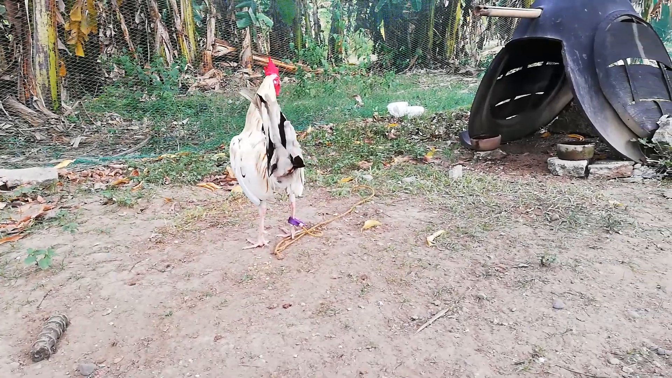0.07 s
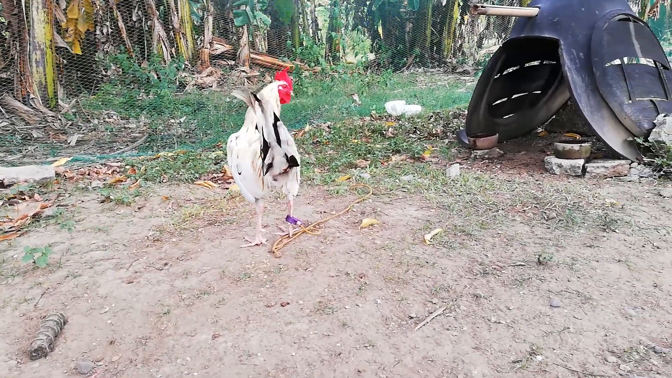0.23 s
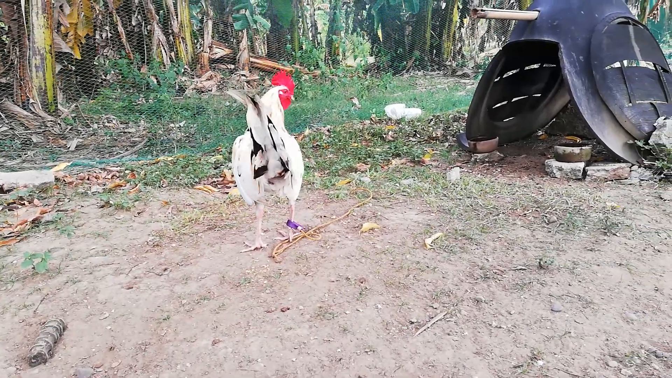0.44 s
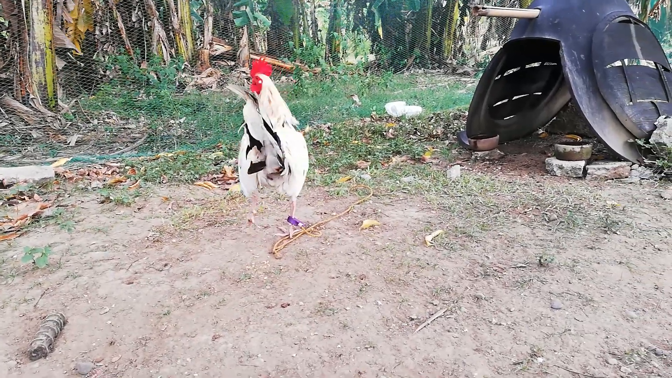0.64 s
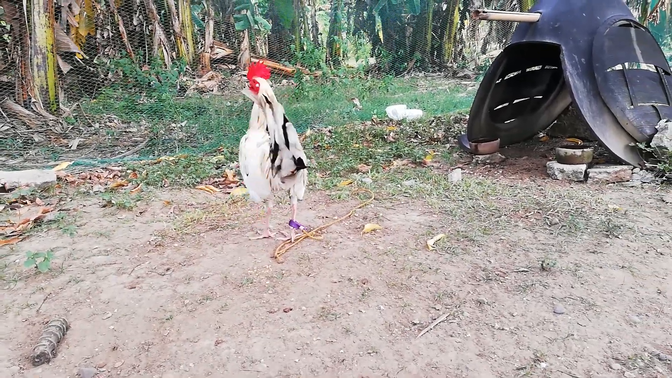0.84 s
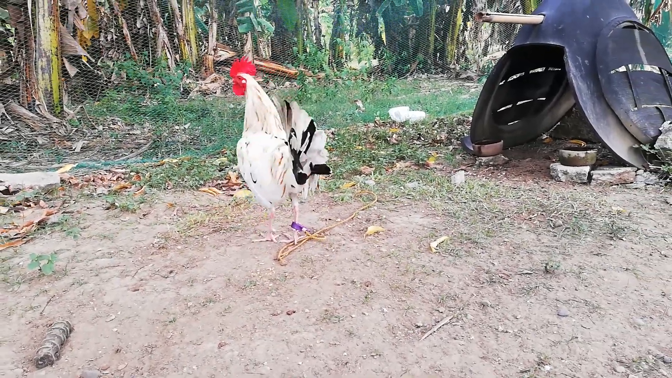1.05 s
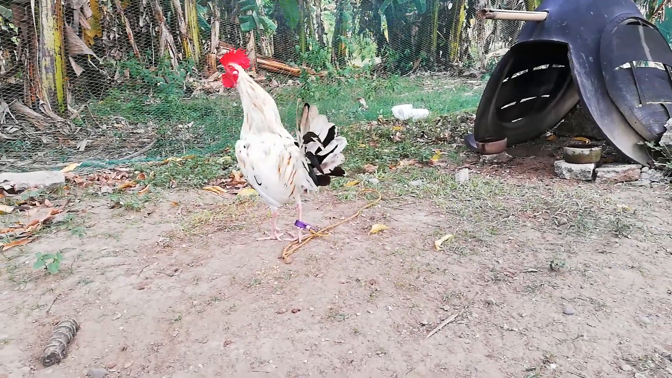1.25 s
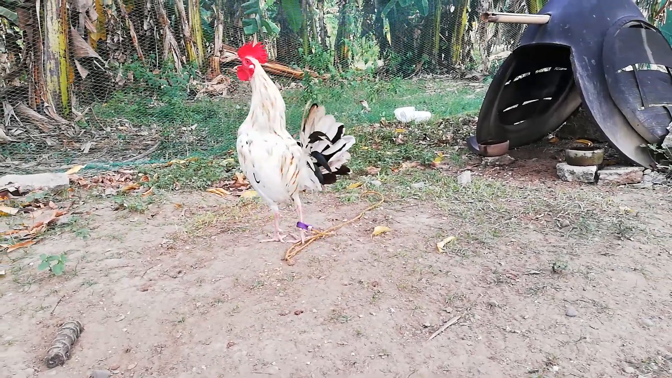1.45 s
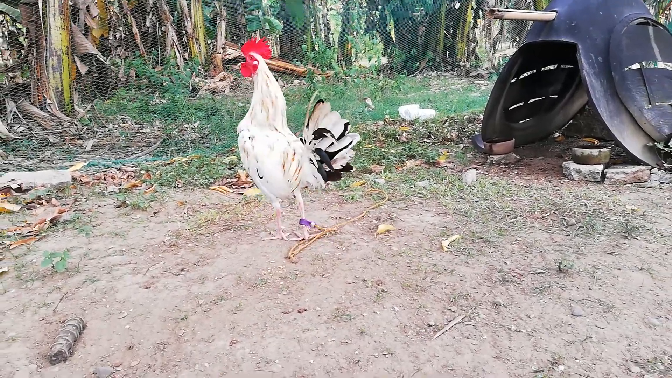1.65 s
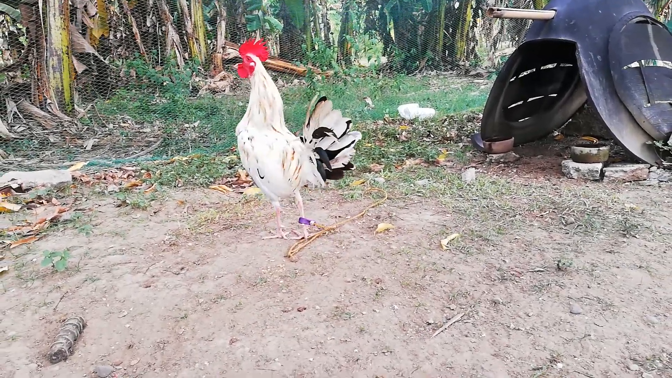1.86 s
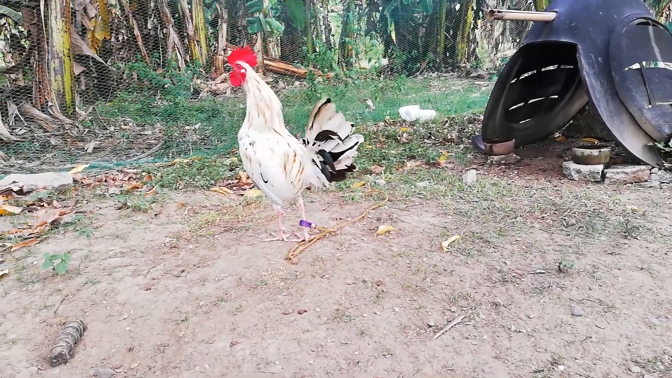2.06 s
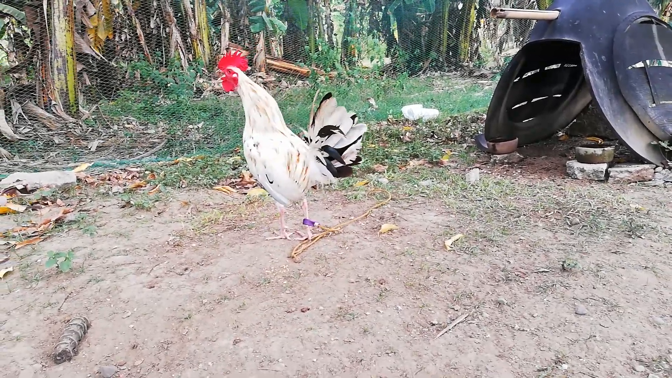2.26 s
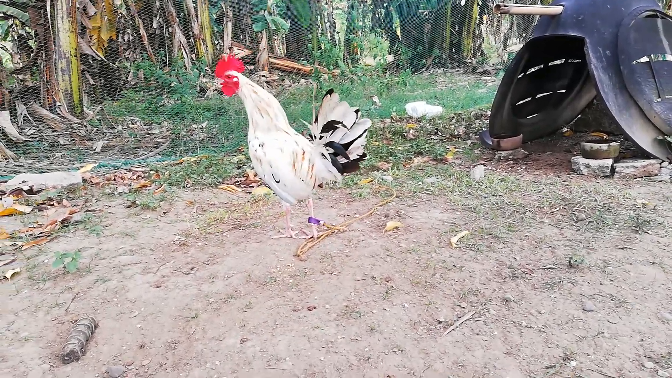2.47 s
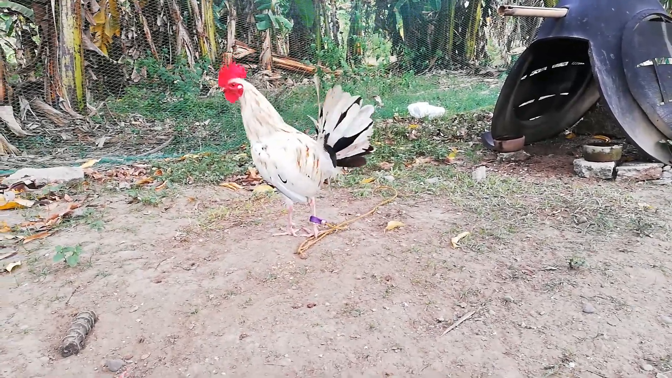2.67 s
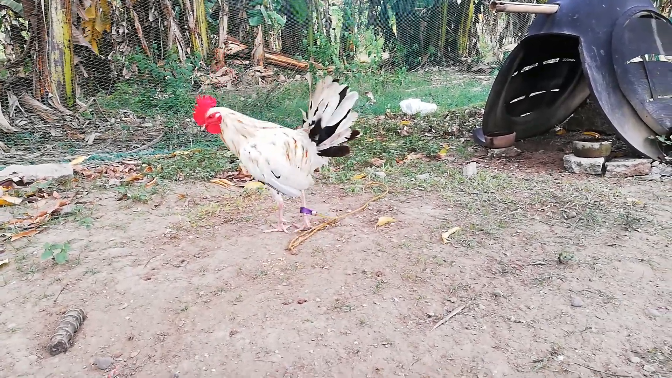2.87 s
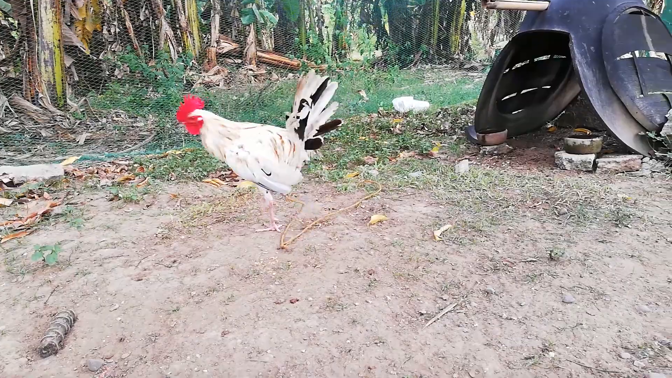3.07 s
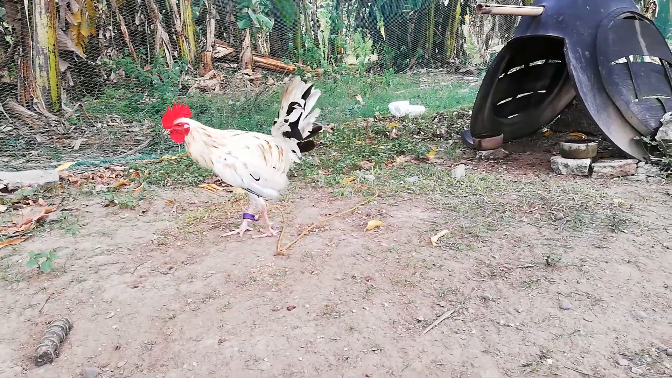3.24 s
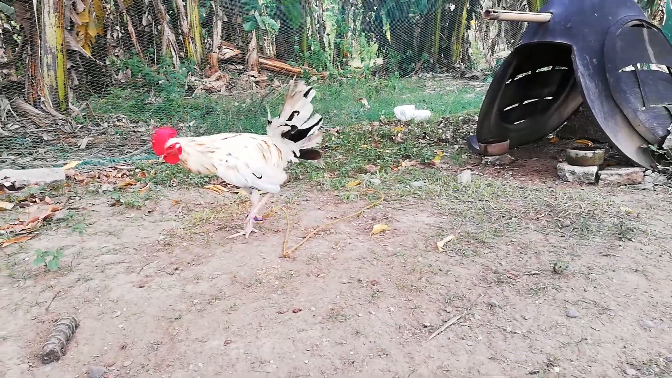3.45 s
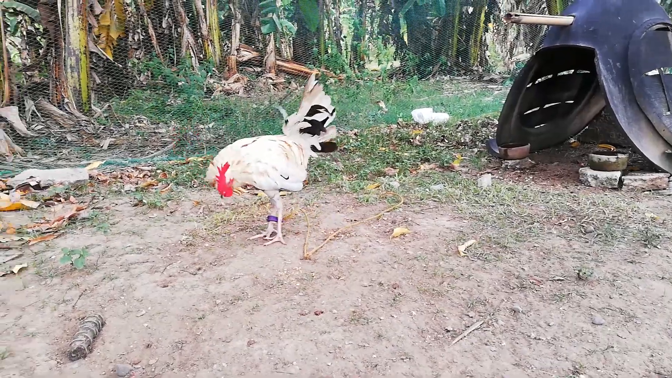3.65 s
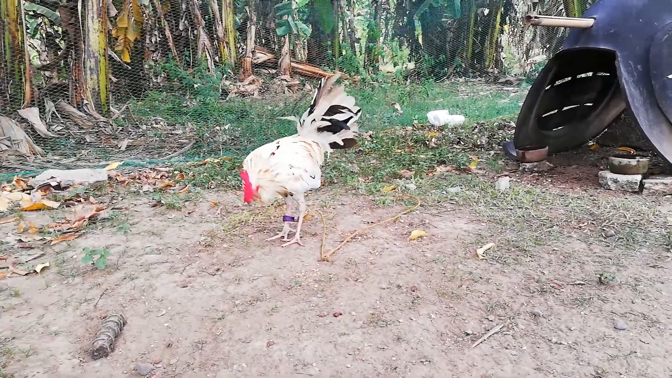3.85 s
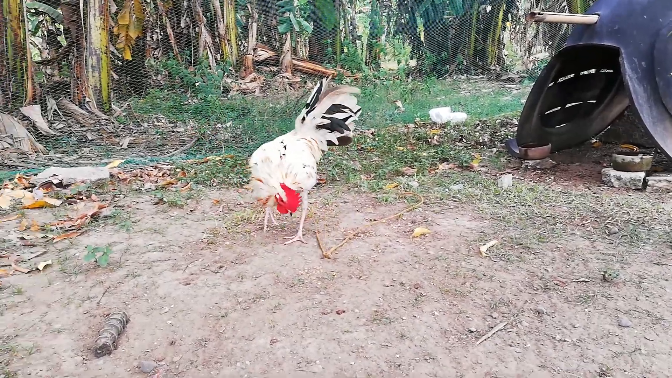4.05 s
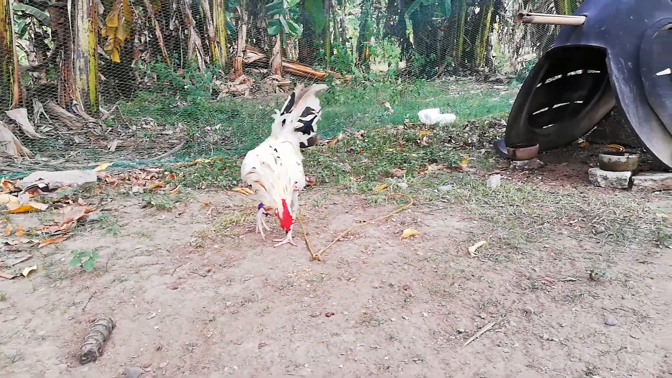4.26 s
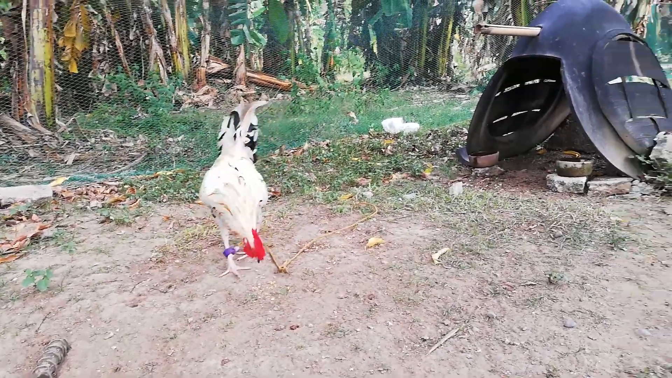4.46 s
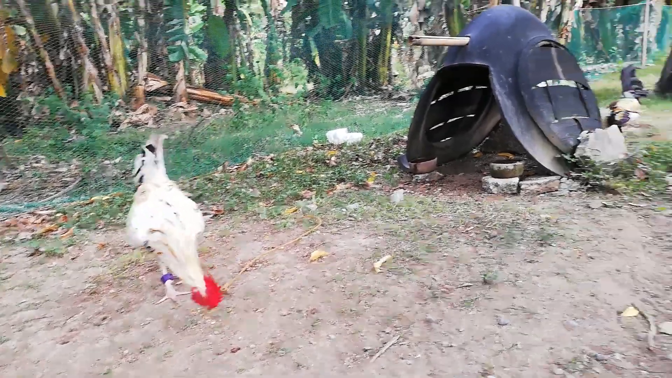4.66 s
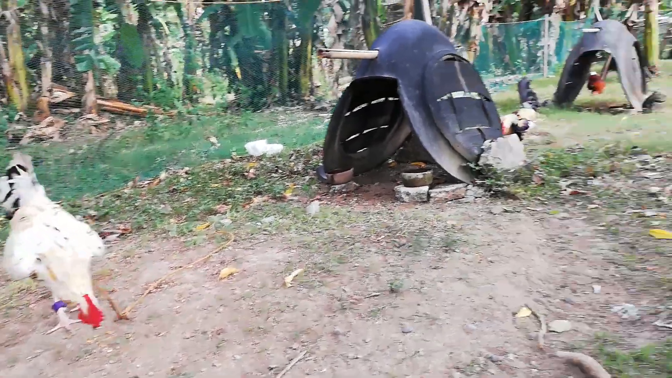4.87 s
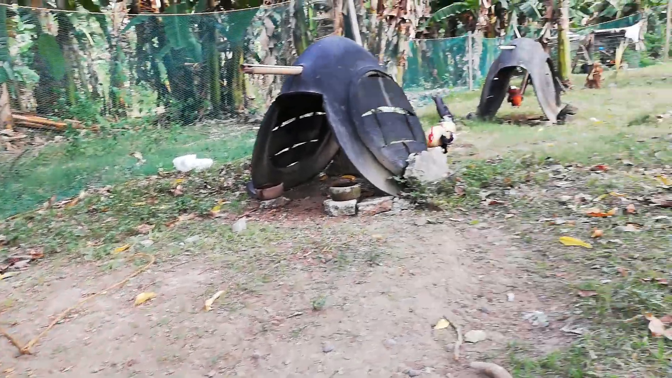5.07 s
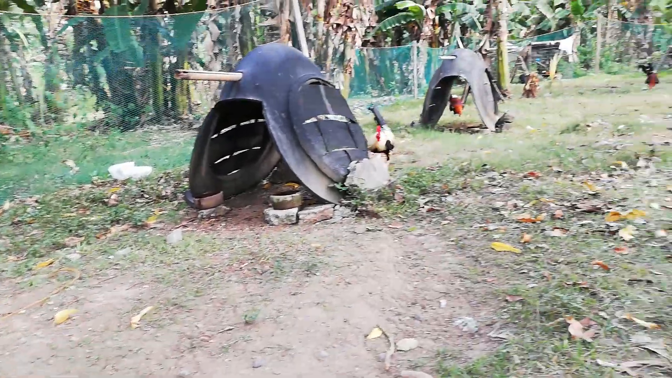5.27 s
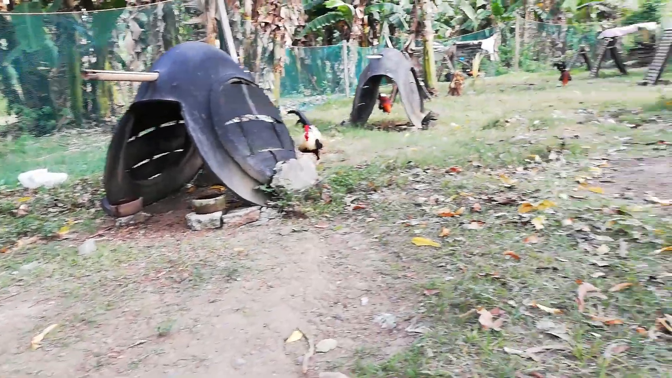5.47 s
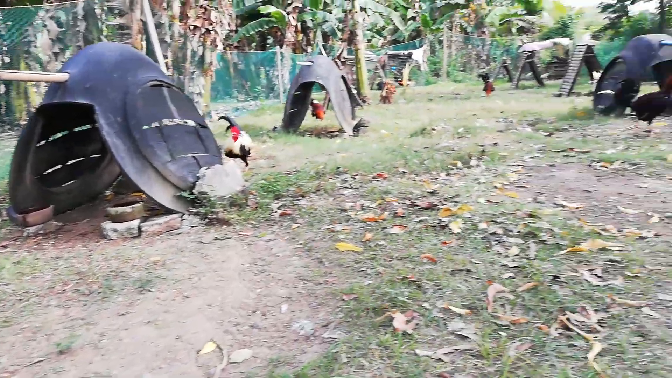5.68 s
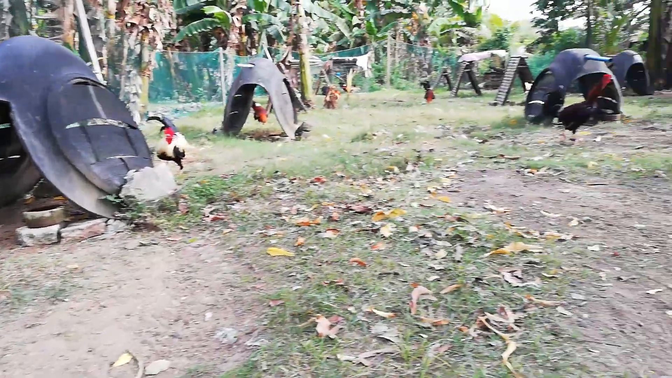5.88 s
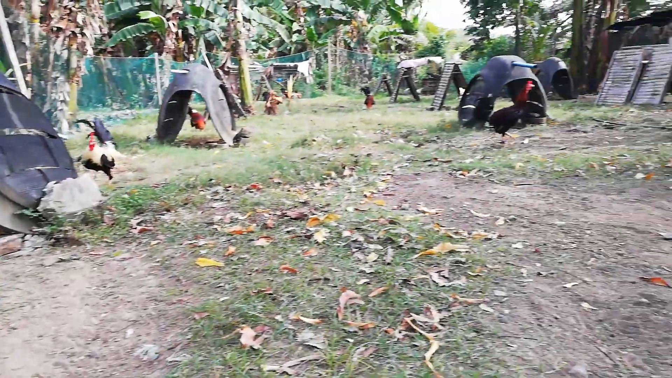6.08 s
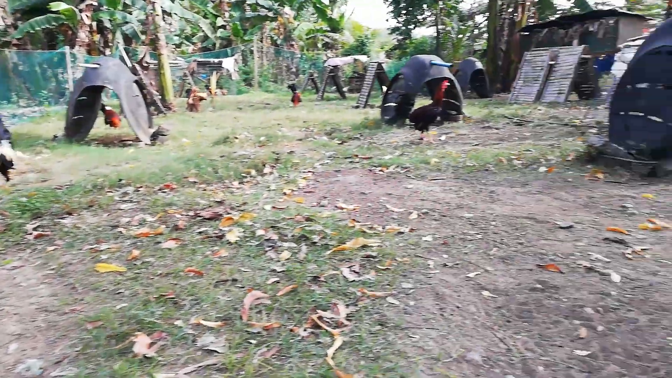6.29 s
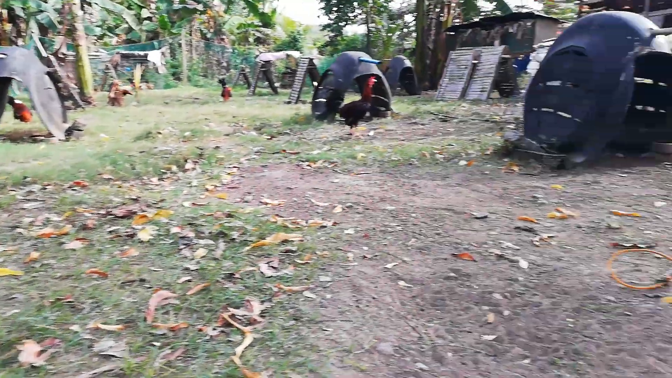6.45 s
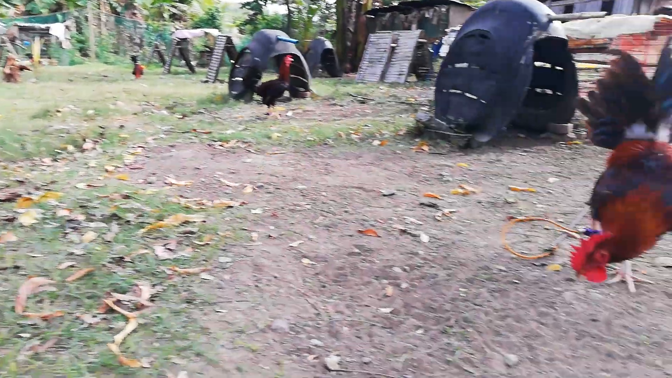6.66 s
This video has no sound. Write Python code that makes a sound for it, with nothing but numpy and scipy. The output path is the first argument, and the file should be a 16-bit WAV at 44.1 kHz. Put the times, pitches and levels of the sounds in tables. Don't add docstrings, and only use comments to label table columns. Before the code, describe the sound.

A nearby rooster gives one loud, raspy crow that sags in pitch, then clucks softly over food while microphone bumps and leaves rustle outdoors.

```python
import sys
import numpy as np
from scipy import signal
from scipy.fft import rfft, irfft, next_fast_len
from scipy.io import wavfile
from scipy.ndimage import uniform_filter1d

SR = 44100
rng = np.random.default_rng(int(sys.argv[2]) if len(sys.argv) > 2 else 0)


def unload_audio(sound):
    columns = np.transpose(np.atleast_2d(sound))
    steps = np.round(np.clip(columns, -1, 1) * 32767)
    wavfile.write(sys.argv[1], SR, steps.astype(np.int16))


def volts_from_db(level):
    exponent = np.asarray(level, float) / 20
    return 10 ** exponent


N = 296386

# frequency in Hz, left minus right in dB.
TURNED_LEAN = [(60, -5), (110, -0.5), (200, 10), (380, -5), (700, -0.5), (1290, -4.5), (2380, -7.5),
               (4400, -10), (8120, -2.5), (15000, 25)]


def evened(x):
    return x / np.sqrt(np.mean(x ** 2) + 1e-20)


def read(points, hz):
    f, value = np.transpose(points)
    return np.interp(np.log(hz + 1), np.log(f + 1), value)


def play(rows):
    s, *columns = np.transpose(rows)
    t = np.arange(s[0], s[-1], 1 / SR)
    return t, [np.interp(t, np.maximum.accumulate(s), c) for c in columns]


def add(mix, s, sound):
    part = mix[..., round(s * SR):][..., :sound.shape[-1]]
    part += sound[..., :part.shape[-1]]


def colour(x, points):
    hz = abs(np.fft.fftfreq(2048, 1 / SR))
    log_gain = np.log(volts_from_db(np.maximum(read(points, hz), -90)))
    taps = np.fft.ifft(np.exp(log_gain - 1j * signal.hilbert(log_gain).imag)).real[:1024]
    y = signal.oaconvolve(x, taps)[:len(x)]
    return y / np.sqrt(abs(uniform_filter1d(y ** 2, size=900)) + 1e-12)


def drift(count, size):
    noise = rng.standard_normal(count)
    return evened(uniform_filter1d(uniform_filter1d(noise, size=size), size=size))


def ports(x, lean, lead):
    size = next_fast_len(len(x), True)
    hz = np.fft.rfftfreq(size, 1 / SR)
    half = volts_from_db(read(lean, hz) / 2) * np.exp(.5j * read(lead, hz))
    return irfft(rfft(x, size) * np.array([half, 1 / half]), size)[:, :len(x)]


def hiss(size, db, same, patchy_db):
    frames, hz = 4 * N // size + 5, np.fft.rfftfreq(size, 1 / SR)[:, None]
    a, b, c, d, patches = rng.standard_normal((5, frames, len(hz))).transpose(0, 2, 1)
    patches = uniform_filter1d(uniform_filter1d(patches, size=9, axis=0), size=7, axis=1)
    patches = evened(patches)
    same = np.clip(same(hz), -1, 1)
    left, other = a + 1j * b, c + 1j * d
    z = np.array([left, same * left + np.sqrt(1 - same ** 2) * other])
    z = z * volts_from_db(db(hz) + patchy_db * patches)
    return evened(signal.istft(z, nperseg=size, noverlap=3 * size // 4)[1][:, :N])


def yard():
    # time in s, rustle level in dB.
    rustle_curve = [(0, -54), (.21, -57.5), (1.27, -53), (2.6, -57), (2.79, -49.5), (3.16, -57),
                    (3.93, -49), (4.18, -54), (4.54, -50), (5.47, -52.5), (5.64, -48), (5.78, -51),
                    (6.49, -53.5), (6.72, -53)]
    # frequency in Hz, level in dB.
    hum_colour = [(150, -35.5), (250, -9), (335, -12.5), (373, -26), (473, -13.5), (1280, -8), (1570, -9),
                  (1770, -6), (6000, -14), (7800, -31), (13200, -120)]
    rustle_colour = [(2060, -49), (3500, -17), (3730, -13), (4250, -16), (4940, -1.5), (6140, 0),
                     (9820, 3.5), (10900, -8), (15600, -31.5)]
    # frequency in Hz, left minus right in dB.
    first_lean = [(60, 1), (110, -1), (200, -3), (380, 2.5), (700, 2), (1290, -5.5), (2380, -6.5),
                  (4400, -6.5), (8120, 11), (15000, 38.5)]
    swing_s = (4.34, 4.37)
    turned_db = 3.5
    t, (rustle_db,) = play(rustle_curve)
    frame_s = np.arange(4 * N // 512 + 5) * 128 / SR
    turned, out = np.interp(frame_s, swing_s, (0, 1)), np.zeros((2, N))
    hum_db = -51 + 0.39 * (rustle_db - rustle_db.mean())
    sides = np.array([.5, -.5])[:, None, None]

    def lean(hz):
        return read(first_lean, hz) * (1 - turned) + read(TURNED_LEAN, hz) * turned

    for level_db, shape, db in ((hum_db, hum_colour, 0), (rustle_db, rustle_colour, turned_db)):
        bed = hiss(512, lambda hz: read(shape, hz) + sides * lean(hz) + db * turned,
                   lambda hz: np.exp(-hz / 200.0), patchy_db=2.0)
        add(out, 0, bed[:, :len(t)] * volts_from_db(level_db + 2.5))
    return out


def insects():
    # start in s, length in s, centre in Hz, level in dB.
    whirrs = [
        (4.5, 0.68, 13900, -59),
        (2.6, .45, 14000, -66),
    ]
    out = np.zeros((2, N))
    for s, length, hz, db in whirrs:
        noise = rng.standard_normal((2, round(length * SR)))
        band = signal.butter(2, [.91 * hz, 1.06 * hz], "bandpass", fs=SR)
        swell = signal.windows.tukey(noise.shape[1], .6)
        add(out, s, volts_from_db(db) * evened(signal.lfilter(*band, noise)) * swell)
    return out


def wind():
    # time in s, breeze level in dB.
    breeze = [(0, -43.5), (1.22, -52), (1.4, -66.5), (2.12, -43.5), (3.02, -40), (3.48, -51.5), (3.93, -46),
              (4.1, -49), (4.4, -33.5), (4.92, -34), (5.15, -46), (5.4, -46.5), (6.12, -58), (6.4, -51.5),
              (6.72, -58)]
    # peak in s, thud in dB, buffet in dB, time in s to lose 20 dB.
    gusts = [(.05, -40.5, -40, 0.28), (.75, -54, -51, 1.5), (2.19, -39, -29.5, 0.01),
             (2.36, -36, -38.5, 0.46), (2.72, -28.5, -32.5, 0.2), (2.819, -24, -20, 0.0731),
             (4.34, -32, -32, 0.17), (4.52, -28, -26, .12), (4.64, -29, -28, .14), (4.71, -33, -29, .08),
             (4.871, -24, -26, 0), (4.963, -33, -30, 0.14), (5.451, -31, -37, 0.07),
             (5.69, -35.5, -41, 0.23), (5.89, -38.5, -41.5, 0.53), (6.2, -42.5, -47, 0.2),
             (6.6, -30.5, -56, 0.13)]
    # frequency in Hz, level in dB.
    thud = [(8.8, -40), (15, -6), (64, 5), (130, -6), (170, -15), (290, -120)]
    buffet = [(41, -57), (70, -2), (150, 0), (318, -15), (445, -27.5), (636, -40.5), (700, -55), (910, -38),
              (1540, -120)]
    # frequency in Hz, left-right likeness from 0 to 1.
    likeness = [(40, 0.95), (130, 0.85), (300, 0.2)]
    buffet_under_db = -8.5
    t, out = np.arange(0, N, 64) / SR, np.zeros((2, N))
    breeze_db = np.interp(t, *np.transpose(breeze))
    s, *peaks, fade = np.transpose(gusts)[..., None]
    for db, under_db, shape in zip(peaks, (0, buffet_under_db), (thud, buffet)):
        gust_db = (db - 20 * abs(t - s) / fade).max(axis=0)
        level_db = np.maximum(breeze_db + under_db, gust_db)
        lumps = volts_from_db(level_db + 2.2 * drift(len(t), size=14))
        gust = hiss(2048, lambda hz: read(shape, hz), lambda hz: read(likeness, hz), patchy_db=3.0)
        out += gust * np.interp(np.arange(N) / SR, t, lumps)
    return out


def knocks():
    # start in s, peak in dB, pitch in Hz.
    finger_knocks = [(0.031, -27.5, 104), (0.41, -36, 64.6), (1.696, -46, 67.3), (1.844, -50, 258.4),
                     (1.844, -42, 132), (1.955, -39, 96.9), (2.062, -36, 69.85), (2.17, -25.5, 99),
                     (2.307, -33, 91.4), (2.441, -25.5, 83.4), (2.757, -17.5, 90), (2.942, -29, 56.5),
                     (3.514, -51, 75.4), (4.294, -22, 152), (4.434, -19, 80), (4.783, -26, 72.7),
                     (4.857, -21.5, 167), (4.953, -16.5, 57.3), (5.443, -23.5, 121), (5.622, -35, 83.4),
                     (6.178, -39, 75.4), (6.463, -38, 53.8), (6.542, -27, 56.5)]
    out, t = np.zeros((2, N)), np.arange(3000) / SR
    for s, db, hz in finger_knocks:
        u = t * hz
        bump = np.sin(2 * np.pi * u) * u * np.exp(-u / 0.64)
        side_gain = volts_from_db(2.5 * rng.standard_normal((2, 1)))
        add(out, s, volts_from_db(db - 5.0) * bump / abs(bump).max() * side_gain)
    return out


def snaps():
    # start in s, peak in dB, centre in Hz, left minus right in dB.
    leaf_snaps = [(0.791, -31, 9600, 7), (2.728, -33, 3210, -2), (2.777, -29, 3220, -3),
                  (3.6187, -41, 10100, 17), (3.823, -31, 9300, 14), (3.9005, -28, 5670, 17),
                  (4.0053, -39, 8390, 13), (4.3611, -26.5, 1270, -7), (4.5246, -28, 6660, 7),
                  (4.5505, -23.5, 5600, -8), (6.1718, -26.5, 3000, -3), (6.257, -28, 2750, -9.5),
                  (6.3996, -33.5, 2930, -21), (6.4532, -25, 2750, -8.5)]
    out, t = np.zeros((2, N)), np.arange(2000) / SR
    fade = 0.59 * np.exp(-t / 0.0033) + 0.46 * np.exp(-t / 0.034)
    for s, db, hz, pan_db in leaf_snaps:
        burst = rng.standard_normal((2, len(t))) * fade
        band = signal.butter(2, [0.66 * hz, min(1.92 * hz, 13000)], "bandpass", fs=SR)
        burst = signal.lfilter(*band, burst)
        side_gain = volts_from_db(np.array([[.5], [-.5]]) * pan_db)
        add(out, s, volts_from_db(db - 4.0) * burst / abs(burst).max() * side_gain)
    return out


def far_crows():
    # start in s, length in s, second harmonic in Hz, its level in dB, fundamental in dB.
    answers = [(3.269, 0.14, 2075, -48, -71), (3.339, 0.097, 2120, -57, -44.5),
               (4.028, 0.13, 2300, -49, -61), (5.332, 0.22, 1693, -49.5, -57),
               (5.771, 0.29, 1982, -44, -43.5), (5.93, 0.256, 1876, -47, -46),
               (6.32, 0.2, 1770, -44.5, -52), (6.479, 0.26, 1690, -47, -61)]
    rise, fall = 0.0352, 0.069
    out = np.zeros((2, N))
    for s, length, hz, upper_db, lower_db in answers:
        u = np.linspace(-1, 1, round(length * SR))
        turns = np.cumsum(hz * (1 - np.where(u < 0, rise, fall) * u ** 2)) / SR
        swell = volts_from_db(-9 * u ** 2) * signal.windows.tukey(len(u), .2)
        for side in out:
            blur = [drift(len(u), size=150) + .6 for _ in range(2)]
            upper = volts_from_db(upper_db) * blur[0] * np.sin(2 * np.pi * turns)
            lower = volts_from_db(lower_db) * blur[1] * np.sin(np.pi * turns)
            add(side, s, (upper + lower) * swell)
    return out * volts_from_db([[-2.5], [2.5]])


def voice(hz, rough, half, throat, rasp, jitter, skip=0):
    flicker_db = 3.5
    wobble = rough * (drift(len(hz), size=50) + drift(len(hz), size=400))
    turns = np.cumsum(hz * (1 + jitter * wobble)) / SR + skip
    keep = np.exp(-.75 * rough * hz / 1000)
    pulses = np.zeros(len(hz))
    for k in range(1, 20):
        flicker = np.minimum(6 * rough * (k * hz > 1600), 1) * drift(len(hz), size=350)
        strength = keep ** k * np.clip(15 - k * hz / 1000, 0, 1)
        pulses += np.cos(2 * np.pi * k * turns) * strength * volts_from_db(flicker_db * flicker)
    pulses *= 1 + 2 * half * np.cos(np.pi * turns)
    puffs = (0.49 + np.exp(-(turns % 1) / 0.17)) * rng.standard_normal(len(hz))
    return np.sqrt(1 - rough ** 2) * colour(pulses, throat), rough * colour(puffs, rasp)


def cackle():
    # start in s, effort in dB, pitch in Hz, rasp share from 0 to 1, hold in s.
    syllables = [
        (5.592, -29, 575, .74, 0.076),
        (5.866, -29.5, 523.8, 0.47, 0.014),
        (5.996, -33, 425, 0.5, 0.017),
        (6.139, -36.5, 390, 0.56, 0.0096),
        (6.324, -42, 382.7, 0.57, 0.022),
    ]
    # frequency in Hz, level in dB.
    throat_colour = [(250, -36), (400, -14), (560, -8.5), (900, 12), (1150, -13.5), (1500, -34),
                     (2000, -13), (2500, -13), (4000, -13), (9000, -16)]
    rasp_colour = [(520, -60.5), (860, 1.5), (1200, -10.5), (1500, -7.5), (1900, 0), (2300, -18),
                   (3200, -19.5), (3800, -10), (4300, -18.5), (5000, -23), (9700, -23.5), (14000, -66)]
    choke_db, choke_s = -14.5, 0.022
    trail_db_per_s, trail_s = -150, .075
    sag_per_s = .6
    out = np.zeros(N)
    for s, db, hz, rough, hold in syllables:
        t = np.arange(0, hold + choke_s + trail_s, 1 / SR)
        choke = choke_db * np.clip((t - hold) / choke_s, 0, 1)
        effort_db = db + choke + trail_db_per_s * np.maximum(t - hold - choke_s, 0)
        rough = np.clip(rough + 0 * t, 0, .95)
        tone, rasp = voice(hz * (1 - sag_per_s * t), rough, 0, throat_colour, rasp_colour, jitter=.045)
        add(out, s, (tone + rasp) * volts_from_db(effort_db) * signal.windows.tukey(len(t), .22))
    return out


def clucks():
    # time of the snap shut in s, peak in dB, pitch in Hz, gullet ring in dB, length in s.
    food_calls = [(3.459, -47, 590, -6, 0.023), (3.569, -39.5, 590, -6, 0.027),
                  (3.618, -35, 355, -6, 0.048), (3.685, -41, 590, -7, 0.02), (3.821, -41.5, 570, 4, 0.021),
                  (4.066, -28, 540, -9, 0.043), (4.148, -27.5, 545, -12, 0.052),
                  (4.221, -28.5, 440, -3, 0.037), (4.28, -41, 480, -3, 0.028), (4.325, -27, 520, -2, 0.03),
                  (4.468, -21, 490, 2, 0.032), (4.606, -24, 335, 12, 0.033),
                  (4.986, -27.5, 650, -10, 0.018), (5.117, -25, 670, -6, 0.022)]
    gullet_hz, gullet_width_hz = 890, 245
    glide_per_s = 12.0
    out = np.zeros(N)
    for s, db, hz, ring_db, length in food_calls:
        u = np.linspace(0, 1, round(length * SR))
        pitch = hz * (1 + glide_per_s * length * (u - .6)) * (1 + 0.075 * drift(len(u), size=50))
        turns = np.cumsum(pitch) / SR
        ring = np.zeros(len(u))
        for k in range(2, 7):
            off_tune = 2 * (k * pitch - gullet_hz) / gullet_width_hz
            ring += np.sin(2 * np.pi * k * turns) / (1 + off_tune ** 2) ** 1.5
        stack = np.sin(2 * np.pi * turns) + volts_from_db(ring_db + 5.5) * ring
        stack += 0.48 * u ** 2 * np.sin(np.pi * turns)
        stack += 0.19 * drift(len(u), size=12)
        stack *= np.sin(np.pi * u ** 1.7)
        add(out, s - length, volts_from_db(db) * stack / abs(stack).max())
    return out


def registers(t):
    # start in s, first pitch in Hz, last pitch in Hz.
    jumps = [(1.282, 689, 895), (1.302, 904, 940), (1.33, 944, 953), (1.388, 954.4, 917.3),
             (1.415, 899.7, 925.3), (1.529, 933.2, 921.5), (1.61, 622, 625.3), (1.716, 940, 930.7),
             (2.075, 597.5, 577.2), (2.135, 578, 655.4), (2.176, 932, 922), (2.225, 897, 865),
             (2.386, 713.4, 704.3), (2.446, 601.4, 568.5), (2.526, 557, 476.6)]
    hoarse = [(.2, .15), (.12, .14), (.17, .17), (.17, .25), (.45, .9), (.03, .03), (.75, .75), (.16, .3),
              (.9, .6), (.35, .18), (.88, .75), (.34, .14), (.3, .26), (.13, .16), (.18, .55)]
    opening, bowed = (0, 5), 5
    onset_rasp, onset_s = .7, .022
    tired_s, tired_half = 2.21, .075
    (start, first_hz, last_hz), (first, last) = np.transpose(jumps), np.transpose(hoarse)
    k = np.clip(np.searchsorted(start, t, "right") - 1, 0, None)
    u = (t - start[k]) / np.diff(np.append(start, t[-1]))[k]
    hz = first_hz[k] + (last_hz - first_hz)[k] * u
    hz = hz * (1 + .045 * (k == bowed) * np.sin(np.pi * u))
    onset = np.isin(k, opening) * np.clip(1 - (t - start[k]) / onset_s, 0, 1)
    rough = first[k] + (last - first)[k] * u + onset_rasp * onset
    hz, rough = (uniform_filter1d(c, size=300) for c in (hz, rough))
    wander = 1 + .016 * rough * drift(len(t), size=800)
    return hz * wander, rough, tired_half * (t > tired_s)


def lifted(x, t, curve, band):
    part = signal.filtfilt(*signal.butter(2, band, "bandpass", fs=SR), x)
    return x + part * (volts_from_db(np.interp(t, *np.transpose(curve))) - 1)


def crow():
    # time in s, level in dB.
    effort = [
        [(1.282, -12.5), (1.32, -11.5), (1.41, -13), (1.445, -30.5), (1.526, -53.5)],
        [(1.532, -13.5), (1.555, -11.5), (1.588, -11), (1.607, -18.5), (1.614, -22), (1.65, -32)],
        [(1.68, -22), (1.712, -16), (1.73, -13.5), (2.03, -13), (2.09, -17.5), (2.17, -18), (2.24, -16.5),
         (2.542, -18.5), (2.564, -29.5)],
    ]
    # time in s, dip in dB, width in ms.
    slips = [(1.293, 8, 4.4), (1.334, 3, 4), (1.374, 3, 4), (1.399, 8, 6), (1.425, 9, 4.0), (1.722, 18, 10),
             (1.751, 16, 10), (1.781, 6, 5), (1.811, 6, 5), (1.835, 8, 5), (1.866, 20, 10), (1.893, 9, 8),
             (1.895, 5, 40), (1.966, 3, 4), (2.058, 4, 12), (1.912, 14, 9), (1.98, 10, 12), (1.996, 9, 8),
             (2.03, 8, 7), (2.047, 4, 5), (2.072, 14, 12), (2.192, 9, 3.9), (2.215, 9, 3.9)]
    # frequency in Hz, level in dB.
    throat_colour = [(300, -34), (600, -23.5), (930, 5), (1250, 7), (1500, -8), (1850, 4), (2300, -4.5),
                     (2800, -7.5), (3750, -12), (4300, -27), (5600, -20), (6500, -15), (7700, -57),
                     (9700, -18), (10600, -37), (14500, -68)]
    rasp_colour = [(450, -55), (800, -8), (1150, 0), (1520, -14), (1900, -5), (2250, 0), (2650, -12),
                   (3300, -6), (3800, -15), (4250, -60), (6000, -70)]
    jet_colour = [(4200, -51), (4700, -2), (6500, 2), (7150, -3.5), (7700, -14), (8300, -8.5), (10000, 1),
                  (11400, -8.5), (12500, -14.5), (13400, -27), (14200, -13), (15000, -45)]
    # time in s, lift in dB.
    beak = [(1.28, 3), (1.45, 13), (1.55, 0), (1.7, 2), (2.1, -1), (2.22, 0.5), (2.35, -6), (2.56, -9.5)]
    neck = [(1.32, 6), (1.34, -3), (1.395, -5.5), (1.415, 4.5), (1.53, 0.5), (2.2, 0.5), (2.3, 3.5),
            (2.345, -6), (2.39, 0)]
    # early centre in Hz, late centre in Hz, width in Hz.
    hollows = [
        (4300, 3940, 950),
        (7650, 7300, 600),
    ]
    sink_s = (2.2, 2.34)
    t, (effort_db,) = play(np.vstack(effort))
    hz, rough, half = registers(t)
    dips = [np.exp(-(1500 * (t - at) / ms) ** 2) for at, db, ms in slips]
    dip_db = sum(db * dip for dip, (at, db, ms) in zip(dips, slips))
    skip = sum(np.cumsum(dip) / dip.sum() * rng.uniform(-.5, -.25) for dip in dips)
    tone, rasp = voice(hz, rough, half, throat_colour, rasp_colour, jitter=.022, skip=skip)
    shimmer_db = 1.8 * rough * drift(len(t), size=120)
    slip_rasp_db = 7 * np.minimum(dip_db / 6, 1) * (1 - rough)
    sound = tone * volts_from_db(shimmer_db - dip_db)
    sound = sound + rasp * volts_from_db(slip_rasp_db + 2.5 * drift(len(t), size=200))
    sound = lifted(sound, t, beak, (2680, 4000))
    sound = lifted(sound, t, neck, (1600, 1960))
    beak_db = np.interp(t, *np.transpose(beak))
    jet = colour(rng.standard_normal(len(t)), jet_colour) * np.minimum(1.6 * rough - .01, .22)
    jet_db = -10.5 + .5 * np.minimum(beak_db, 0) + 1.75 * drift(len(t), size=400)
    sound = sound + volts_from_db(jet_db) * jet
    sound = signal.lfilter(*signal.butter(4, 480, "highpass", fs=SR), sound)
    sunk = np.interp(t, sink_s, (0, 1))
    for *places, width in hollows:
        early, late = (signal.filtfilt(*signal.iirnotch(f, f / width, fs=SR), sound) for f in places)
        sound = (1 - sunk) * early + sunk * late
    out = np.zeros(N)
    add(out, t[0], sound * volts_from_db(effort_db) * signal.windows.tukey(len(t), .004))
    return out


def echo(x):
    # frequency in Hz, time in s to fade by 60 dB.
    fade_times = [(400, 0.21), (1500, 0.48), (4000, 0.62), (12000, 0.031)]
    taps = np.zeros((2, SR // 2))
    at = np.arange(300, SR // 2 - 20, 20)
    at = at + rng.integers(0, 20, (2, len(at)))
    np.put_along_axis(taps, at, rng.choice([-1., 1.], at.shape), 1)
    hz, t, z = signal.stft(taps, SR, nperseg=256)
    tail = signal.istft(z * volts_from_db(-60 * t / read(fade_times, hz)[:, None]), SR, nperseg=256)[1]
    return signal.fftconvolve(x[None], tail / np.linalg.norm(tail[0]), axes=1)[:, :N]


def bounce(x):
    taps = np.zeros((2, 900))
    taps[:, 0] = 1
    at = rng.integers(90, 900, (2, 6))
    np.put_along_axis(taps, at, volts_from_db(-21) * rng.choice([-1., 1.], (2, 6)), 1)
    return signal.oaconvolve(x, taps, axes=1)[:, :N]


def scene():
    # frequency in Hz, left minus right in dB.
    near_lean = [(300, -16.5), (800, 10.5), (1000, 10), (1250, -3), (1500, -17.5), (1900, 1.5), (2500, -5),
                 (3500, -5.5), (5000, -10), (6500, 5), (9000, 18.5), (14000, 4.5)]
    # frequency in Hz, phase lead in radians.
    near_lead = [(100, 5), (500, 1.12), (1300, 1.5), (1600, -2.5), (2400, -1.41), (2700, -4.5), (3700, -1),
                 (4300, -5), (5700, 2), (6500, 1), (10500, 4), (15000, 3)]
    side_lead = [(300, 2), (600, -1.1), (1300, 8), (1800, -1.2), (4000, -1.5)]
    near, other = crow() + clucks(), cackle()
    birds = volts_from_db(1.0) * ports(near, near_lean, near_lead)
    birds = birds + volts_from_db(3.5) * ports(other, TURNED_LEAN, side_lead)
    loudness_db = 10 * np.log10(abs(uniform_filter1d(near ** 2, size=6000)) + 1e-9)
    duck = volts_from_db(-.4 * np.maximum(loudness_db + 22, 0))
    far_walls = echo(volts_from_db(-21) * near + volts_from_db(-9) * other)
    background = far_crows() + wind() + duck * yard() + snaps() + knocks() + insects()
    return bounce(birds) + far_walls + background


def roll_off(x):
    return signal.sosfilt(signal.butter(12, 15750, fs=SR, output="sos"), x)


def record(dry):
    z = signal.stft(1.2 * np.tanh(dry / 1.2), nperseg=1024)[2]
    power = uniform_filter1d(uniform_filter1d(abs(z) ** 2, size=7, axis=1), size=5, axis=2)
    band_db = 10 * np.log10(abs(power) + 1e-16)
    depth_db = np.where(np.arange(513) > 310, 50, 46)[:, None]
    masked = band_db < band_db[:, 12:].max(axis=(0, 1)) - depth_db
    masked[:, :60], masked[:, 366:] = False, True
    kept = signal.istft(z * np.where(masked, .004, 1), nperseg=1024)[1][:, :N]
    return roll_off(kept)


dry = scene()
out = record(dry)
unload_audio(out)
```